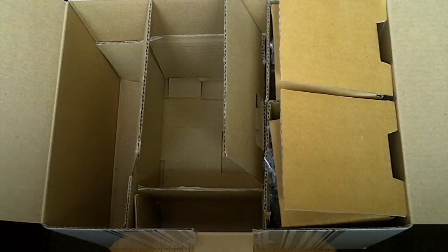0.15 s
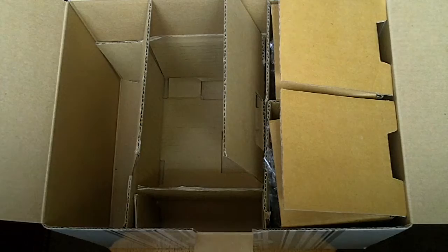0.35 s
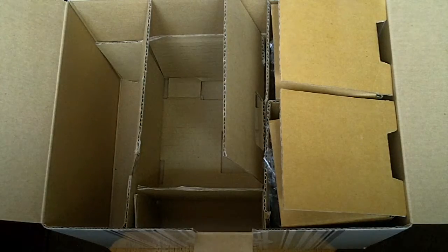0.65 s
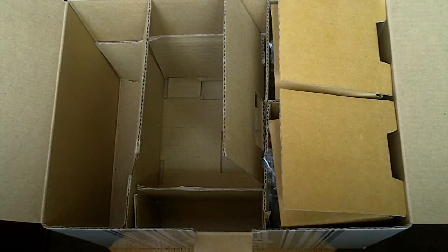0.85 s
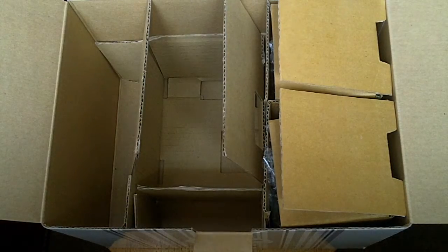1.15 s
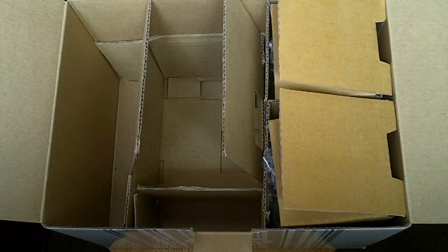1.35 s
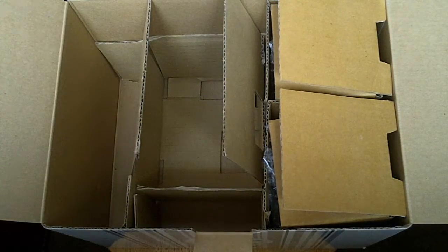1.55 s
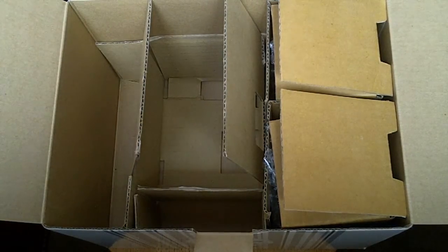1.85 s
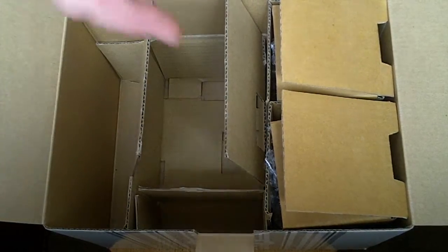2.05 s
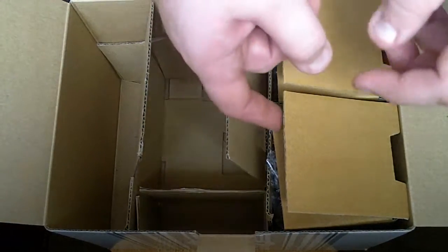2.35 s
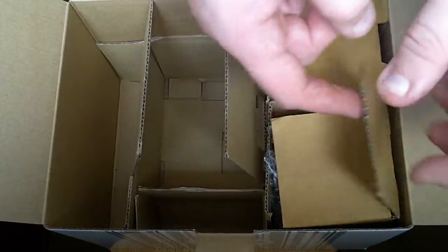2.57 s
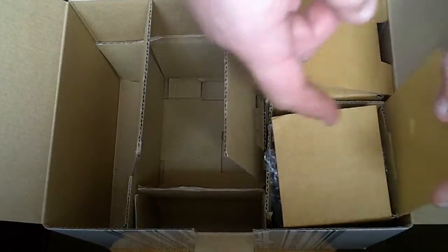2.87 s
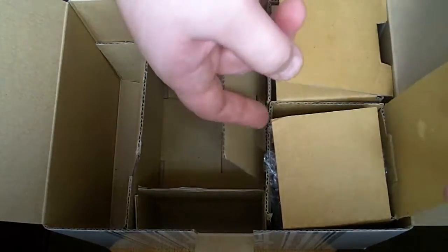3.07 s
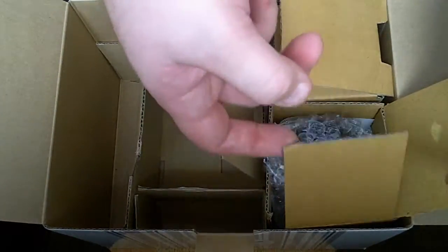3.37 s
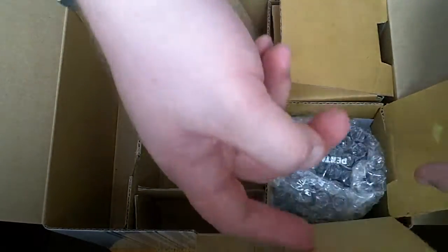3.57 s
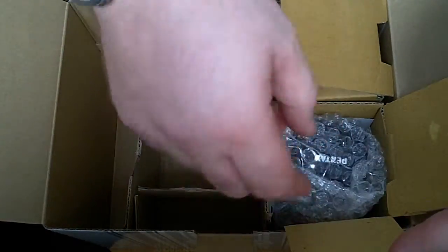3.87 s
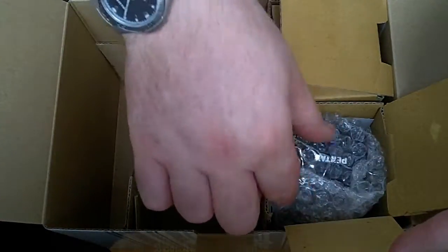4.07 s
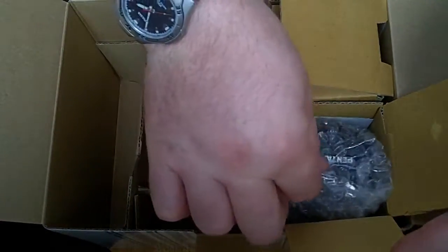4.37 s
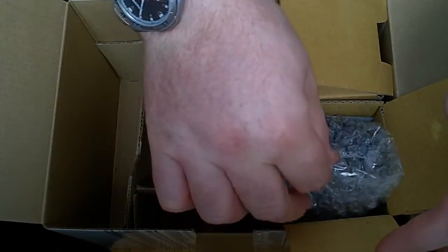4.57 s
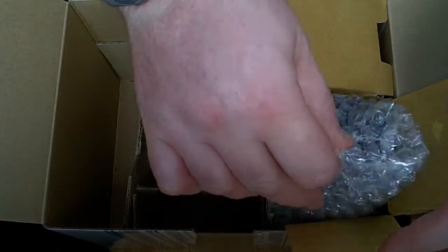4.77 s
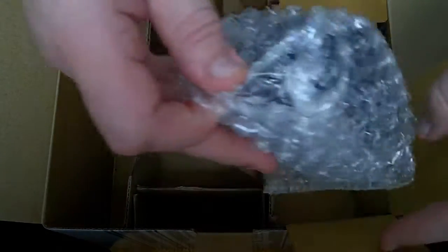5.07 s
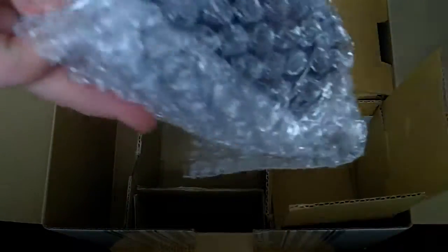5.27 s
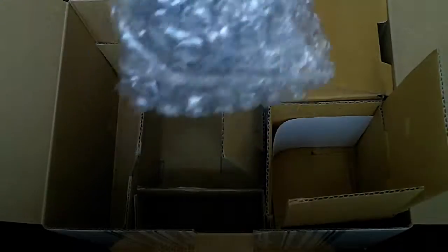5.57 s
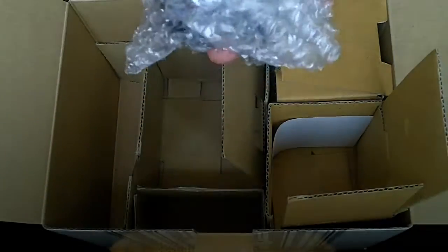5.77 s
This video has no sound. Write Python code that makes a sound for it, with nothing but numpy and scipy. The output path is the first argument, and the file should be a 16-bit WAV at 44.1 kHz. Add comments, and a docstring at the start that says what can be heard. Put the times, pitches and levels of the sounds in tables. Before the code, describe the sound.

A quiet small room with a soft fan and a very faint thin whine. Card hisses and scrapes, then is set down with a dull thud and a tiny squeak. After a pause, fingers scuff the lids, a flap snaps free with one loud hollow crack, then bubble wrap crinkles in bursts against the box wall. Close, small camera microphone with dulled treble.

```python
"""Unpacking a cardboard box

A small camera in a quiet room with a fan (coloured noise, narrow resonances); the camera whines (sines).
Card slides (streams of tiny slips) and is put down with a thud (table modes), then a faint squeak.
Fingers lift a lid and an inner flap snaps free (cracks, ringing panels); creases flick (noise bursts).
A bubble-wrapped item is dragged out along the box wall, crinkling (clumped slips, ticks, wall drone)."""
import sys
import numpy as np
from scipy import signal
from scipy.fft import rfft, irfft, next_fast_len
from scipy.io import wavfile
from scipy.ndimage import map_coordinates

SR = 44100
rng = np.random.default_rng(int(sys.argv[2]) if len(sys.argv) > 2 else 0)


def inscribe(sig):
    """Save sig as 16-bit PCM at rate SR to the path in sys.argv[1].

    A 1-D sig is mono; a 2-D sig holds one channel per row.
    Samples are clipped to [-1, 1] before scaling.
    """
    pcm = np.round(np.clip(np.atleast_2d(sig).T, -1, 1) * 32767)
    wavfile.write(sys.argv[1], SR, pcm.astype(np.int16))


N = 261072

# spectrum of rubbed card: (frequency [Hz], relative level [dB])
CARD_SPECTRUM = [(300, -23), (1000, 0.5), (1700, -0.5), (2400, -4), (4000, -8.5), (7000, -13), (15000, -19)]


def amp(db):
    """Decibels to gain."""
    return 10 ** (np.asarray(db) / 20)


def unit(x):
    """Scale to rms 1."""
    return x / np.sqrt(np.mean(x ** 2) + 1e-20)


def along(points, hz):
    """Interpolate (Hz, value) points on a log frequency axis."""
    f, v = np.transpose(points)
    return np.interp(np.log(hz + 1), np.log(f + 1), v)


def gains(strokes, attack_s, swell_db, release_s):
    """One gain track per dB column: every stroke sets in, swells to its level at its end, then decays."""
    t = np.arange(N) / SR
    power = np.zeros((2, N))
    for start, end, *levels_db in strokes:
        progress = np.clip((t - start) / (end - start), 0, 1)
        onset = 1 - np.exp(-np.maximum(t - start, 0) / attack_s)
        swell = amp(swell_db * (progress - 1))
        release = np.exp(-np.maximum(t - end, 0) / release_s)
        power += (amp(levels_db)[:, None] * onset * swell * release) ** 2
    return np.sqrt(power)


def wobble(knots_per_s):
    """A smooth random curve through normally distributed knots."""
    knots = rng.standard_normal(int(N * knots_per_s / SR) + 4)
    return map_coordinates(knots, [np.arange(N) * knots_per_s / SR])


def filtered(x, response):
    """x times a response of frequency."""
    size = next_fast_len(len(x) + SR // 4)
    spectrum = rfft(x, size) * response(np.fft.rfftfreq(size, 1 / SR))
    return irfft(spectrum, size)[:len(x)]


def coloured(x, points, size=4096):
    """x through a causal minimum-phase filter with the given spectrum, made by folding its cepstrum."""
    cepstrum = irfft(np.log(amp(along(points, np.fft.rfftfreq(size, 1 / SR)))))
    cepstrum[1:size // 2] *= 2
    cepstrum[size // 2 + 1:] = 0
    impulse = irfft(np.exp(rfft(cepstrum)))
    return signal.fftconvolve(x, impulse)[:len(x)]


def band(x, centre_hz, width_hz):
    """x through one resonance."""
    return filtered(x, lambda f: 1j * f * width_hz / (centre_hz ** 2 - f * f + 1j * f * width_hz))


def add(track, s, sound):
    """Mix a sound into the track at time s [s]."""
    part = track[round(s * SR):][:len(sound)]
    part += sound[:len(part)]


def grains(per_s, spread_db):
    """Tiny slips at random moments, mostly weak and a few strong, rms 1."""
    size = amp(spread_db * np.minimum(rng.exponential(size=N), 4))
    hits = rng.random(N) < per_s / SR
    return unit(hits * size * rng.choice([-1, 1], N))


def fan():
    """Steady moving air with a few narrow resonances."""
    # moving air: (frequency [Hz], relative level [dB])
    air_spectrum = [(20, -20.5), (60, -14), (100, -4.5), (140, 0), (330, 0), (600, -4), (800, -8),
                    (1000, -7.5), (1400, -9), (2000, -14.5), (4000, -29.5), (7000, -35.5), (15000, -25.5)]
    # fan resonances: (frequency [Hz], width [Hz], rms [dB])
    resonances = [(758.4, 19, -63), (877.4, 3.1, -61), (1374, 2.9, -67)]
    out = amp(-50.0 + 0.11 * wobble(7.36)) * unit(coloured(rng.standard_normal(N), air_spectrum))
    for hz, width_hz, rms_db in resonances:
        out += amp(rms_db) * unit(band(rng.standard_normal(N), hz, width_hz))
    return out


def electronics():
    """The camera's thin whine with unsteady phase, and a faint tick with every picture frame."""
    # camera whine: (frequency [Hz], rms [dB])
    tones = [(2877, -70.5), (5696, -86), (5755, -91), (7860, -76.5), (11450, -90), (14384, -92)]
    t = np.arange(N) / SR
    jitter_rad = 0.45 * wobble(70)
    whine = sum(amp(rms_db) * np.sqrt(2) * np.sin(2 * np.pi * hz * t + jitter_rad) for hz, rms_db in tones)
    frame_hz = 59.94
    gate = (t - 0.0125) * frame_hz % 1 < 0.1  # open for a tenth of each frame
    ticks = band(band(gate * rng.standard_normal(N), 6540, 1000), 6540, 1000)
    return whine + amp(-86) * unit(ticks)


def slide():
    """Card rubbed by card or fingers: fibres hiss under an uneven stroke; its edge scrapes lower down."""
    # strokes: (start [s], end [s], hiss [dB before trim], scrape [dB before trim])
    strokes = [(0.48, 0.6, -53, -60), (0.59, 0.73, -45.5, -53), (0.745, 0.81, -45.5, -41.5),
               (0.825, 0.85, -49, -49), (0.87, 1.05, -51, -54.5), (1.05, 1.135, -40, -43.5),
               (2.12, 2.24, -53.5, -52), (2.28, 2.37, -54.5, -48.5), (2.42, 2.61, -53.5, -51),
               (2.66, 2.84, -54, -50), (2.99, 3.2, -55, -53), (3.41, 3.465, -58, -49.5),
               (3.78, 4.1, -85, -53.5)]
    # scraping edge: (frequency [Hz], relative level [dB])
    scrape_spectrum = [(100, -23), (400, -8), (600, -1), (800, -4.5), (1500, -0.5), (2100, -11),
                       (4000, -45.5)]
    hiss, scrape = gains(strokes, attack_s=0.011, swell_db=5, release_s=0.041)
    fibres = unit(coloured(grains(per_s=7000, spread_db=4.5), CARD_SPECTRUM))
    edge = unit(coloured(grains(per_s=2500, spread_db=0.5), scrape_spectrum))
    uneven_hiss = amp(-2.5 + 0.64 * wobble(45.1)) * hiss
    uneven_scrape = amp(-1.0 + 0.91 * wobble(50)) * scrape
    return uneven_hiss * fibres + uneven_scrape * edge


def snaps():
    """A crease or card edge flicks over in a burst of a few milliseconds: a broad tick with its own pitch."""
    # clearest flicks: (time [s], peak [dB], pitch [Hz])
    flicks = [(.797, -28, 1080), (0.846, -31, 1580), (.975, -35, 2600), (2.777, -26, 6860),
              (3.003, -39.5, 3480), (3.189, -37, 2980), (3.316, -21, 1640), (3.418, -34.5, 2380),
              (3.462, -35.5, 2430), (3.774, -42, 2980), (4.1806, -31.5, 1970), (4.198, -33, 7050),
              (4.947, -23, 1500), (4.965, -25.5, 2000), (5.023, -30, 1900), (5.029, -20.5, 7500),
              (5.059, -37, 10000), (5.079, -42, 2600), (5.205, -37, 2270), (5.351, -39, 1800),
              (5.495, -34, 3430), (5.576, -23, 2250), (5.681, -25, 7500), (5.712, -26, 9000),
              (5.7693, -23, 2300), (5.822, -22, 2850)]
    out, t = np.zeros(N), np.arange(SR // 16) / SR
    decay = amp(-60 * t / 0.0035) + amp(-15.0 - 60 * t / 0.077)
    for s, peak_db, hz in flicks:
        flick = band(rng.standard_normal(len(t)) * decay, hz, 0.47 * hz)
        add(out, s, amp(peak_db) * flick / np.abs(flick).max())
    return out


def thuds():
    """Soft landings of the card ring the table; a harder one reaches its higher modes."""
    # landings: (time [s], level [dB before trim], hardness [Hz])
    landings = [(1.109, -13.5, 230), (1.1203, -22, 230), (1.1398, -13.5, 607)]
    # table modes: (frequency [Hz], level [dB], t60 [s])
    modes = [(70.4, -23, 0.6), (140.4, -8.5, 0.26), (212.4, 2.5, 0.073), (289, -2.5, 0.085),
             (457, 1.5, 0.055), (483, -13, 0.071), (700, -14, 0.025), (1124, -5, 0.083)]
    out, t = np.zeros(N), np.arange(SR // 2) / SR
    for s, db, hard_hz in landings:
        ring = np.zeros(len(t))
        for hz, level_db, t60_s in modes:
            reach = 1 / np.hypot(1, (hz / hard_hz) ** 2)
            ring += reach * amp(level_db - 60 * t / t60_s) * np.cos(2 * np.pi * hz * t)
        noise = band(band(rng.standard_normal(len(t)), hard_hz, hard_hz), hard_hz, 2 * hard_hz)
        scuff = unit(noise) * amp(-20 - 60 * t / 0.14)
        onset = 1 - np.exp(-t * 0.62 * hard_hz)
        add(out, s, amp(db - 1) * (ring + scuff) * onset)
    return coloured(out, [(25, -14), (55, -20), (110, 0)])  # the surface radiates little deep bass


def chirp():
    """A brief, faint squeak with a dry scuff, after the card is down: two noise bands under one swell."""
    swell = np.exp(-((np.arange(N) / SR - 1.448) / 0.012) ** 2)
    squeak = unit(band(band(rng.standard_normal(N), 1520, 160), 1430, 160))
    scuff = unit(coloured(rng.standard_normal(N), CARD_SPECTRUM))
    return swell * (amp(-47.5) * squeak + amp(-54) * scuff)


def knocks():
    """A flap springs free or is bumped: a short crack, then the panels and the hollow of the box ring."""
    # knocks: (time [s], level [dB], hollow [dB], crack [dB before trim], pitch ratio of the struck panel [1])
    hits = [(2.223, -44, 9, -10, 1.66), (2.251, -46.5, 16, -4, 1.2), (2.7779, -23.5, -13, -2, 0.98),
            (2.784, -30.5, 10.5, -8, 1.42), (2.868, -37, 13, -4, 1.06), (3.0276, -40, 13.5, 10.5, 1.42),
            (3.101, -42.5, 17, 5, 1.06), (3.2446, 3.5, -3.5, -1.5, 1.014), (3.818, -47.5, 17, -6, 0.905),
            (4.3272, -27, -3, 7, 1.4), (4.4919, -27, 5.5, 14, 0.97), (4.698, -39, 0, 10.5, 1.5),
            (5.0277, -23, 6, 9.5, 1.28), (5.675, -37.5, 14, 3, 1.56), (5.898, -34, 8.5, 0, 1.38)]
    # box panels: (frequency at pitch ratio 1 [Hz], level [dB], t60 [s])
    panels = [(154, -24.5, 0.09), (227.4, -15, 0.14), (338.4, -5, 0.038), (700, -21, 0.027),
              (890, 0, 0.0098), (1005, -3, 0.04), (1070, -24, 0.018), (1375, -33, 0.02), (1650, -14, 0.03),
              (1853, -5, 0.025), (1922, -6, 0.014), (2312, -9, 0.018), (3100, -45, 0.12)]
    # crack: (frequency [Hz], relative level [dB])
    crack_spectrum = [(30, -22), (100, -10), (300, -8), (600, -4), (1050, 4.5), (1900, -1), (2700, -5),
                      (4300, -14.5), (7000, -23), (15000, -28)]
    out, t = np.zeros(N), np.arange(SR // 3) / SR
    for s, db, hollow_db, crack_db, pitch in hits:
        ring = np.zeros(len(t))
        for k, (hz, level_db, t60_s) in enumerate(panels):
            strength_db = level_db + rng.standard_normal() + hollow_db * (hz < 500)
            ring += (-1) ** k * amp(strength_db - 60 * t / t60_s) * np.sin(2 * np.pi * pitch * hz * t)
        ring *= 1 - np.exp(-t / 0.0011)  # the bend takes a moment to cross the panel
        edge = band(rng.standard_normal(len(t)) * amp(-60 * t / 0.0032), 3600, 1900)
        # the crack, then loose layers of card chattering
        rattle = amp(-60 * t / 0.032) + amp(-16.5 - 60 * t / 0.28)
        crack = unit(coloured(rng.standard_normal(len(t)), crack_spectrum)) * rattle + amp(12) * edge
        # a short low push under the crack
        push = amp(-39 + hollow_db) * (1 - t / 0.012) * np.exp(-t / 0.0054)
        add(out, s, amp(db) * (ring + amp(crack_db - 13.0) * crack + push))
    return out


def wrap():
    """The film rubs and crinkles in clumps, ticks as it flexes, and drags on the box wall, which drones."""
    # tugs at the item: (start [s], end [s], crinkle [dB before trim], wall drone [dB before trim])
    tugs = [(4.235, 4.335, -41.5, -45.5), (4.36, 4.53, -45.5, -43), (4.55, 4.72, -45.5, -46.5),
            (4.73, 4.84, -40.5, -63), (4.85, 5.02, -39, -44), (5.665, 5.815, -39, -44),
            (5.87, 5.92, -48, -45)]
    # film: (frequency [Hz], relative level [dB])
    film_spectrum = [(150, -26), (500, -10), (900, 0.5), (2100, 3.5), (2900, -3.5), (4000, -8.5),
                     (7000, -10.5), (10000, -15), (15000, -19.5)]
    # box wall: (frequency [Hz], relative level [dB])
    wall_spectrum = [(50, -46), (130, -8.5), (270, -10.5), (350, 4), (430, 0), (560, -6.5), (680, -5.5),
                     (1100, -9.5), (3000, -31.5)]
    # the film tightens through each tug and goes slack quickly after it
    crinkle, drag = gains(tugs, attack_s=0.0033, swell_db=7, release_s=0.023)
    # from the first touch on, the grip keeps the film rustling faintly
    held = np.arange(N) / SR > 4.11
    crinkle = np.hypot(crinkle, amp(-59) * held)
    drag = np.hypot(drag, amp(-57.5) * held)
    rub = unit(coloured(grains(per_s=5000, spread_db=3), film_spectrum))
    crackle = unit(coloured(grains(per_s=450, spread_db=2.0), film_spectrum))
    wall = unit(coloured(grains(per_s=1500, spread_db=4), wall_spectrum))
    ticks = unit(band(grains(per_s=130, spread_db=7), 11500, 7000))
    # single bubbles give way with a small pop
    buckles = unit(band(grains(per_s=70, spread_db=3.2), 2700, 2400))
    clumps = amp(1.14 * wobble(60))
    # square root: even a gentle grip makes the film tick
    flexing = np.sqrt(crinkle) * (amp(-49.0) * ticks + amp(-30.5) * buckles)
    rustle = crinkle * (amp(0.5) * rub + amp(-1.5) * crackle)
    drone = amp(4.0) * drag * wall
    return flexing + clumps * (rustle + drone)


def room(x):
    """The small room's answer: a noise tail in which each frequency dies at its own speed."""
    # reverberation: (frequency [Hz], t60 [s])
    decay_times = [(100, 0.19), (300, 0.28), (1000, 0.21), (2200, 0.21), (4500, 0.083), (12000, 0.11)]
    hz, t, z = signal.stft(rng.standard_normal(SR // 2), SR, nperseg=256)
    decay = amp(-60 * t / along(decay_times, hz)[:, None])
    tail = signal.istft(z * decay, SR, nperseg=256)[1]
    tail *= 1 - np.exp(-np.arange(len(tail)) / SR / 0.0044)
    return signal.fftconvolve(x, tail / np.linalg.norm(tail))[:N]


def scene():
    """Handling sounds, their room and the fan."""
    handling = slide() + snaps() + thuds() + chirp() + knocks() + wrap()
    return (handling + amp(-14.0) * room(handling) + fan())[None]


def record(dry):
    """The port colours the treble, the electronics whine, peaks are rounded off and the top is cut."""
    # microphone behind its small port: (frequency [Hz], level [dB])
    port = [(4200, 0), (4570, -10.5), (4800, -23.5), (5200, -9.5), (5850, -24), (6450, -7.5), (7800, -6.5),
            (8500, -25), (9150, -11), (10300, -11.5), (11400, -20.5), (12000, -31), (12700, -29),
            (15200, -21)]
    top_hz = 15500
    sound = coloured(dry[0], port) + electronics()
    sound = sound / (1 + np.abs(sound) ** 12) ** (1 / 12)
    return filtered(sound, lambda hz: hz < top_hz)[None]


dry = scene()
out = record(dry)
inscribe(out)
```